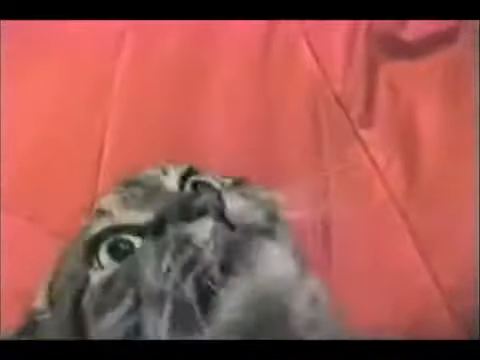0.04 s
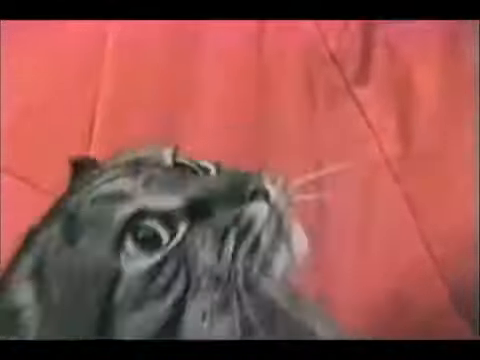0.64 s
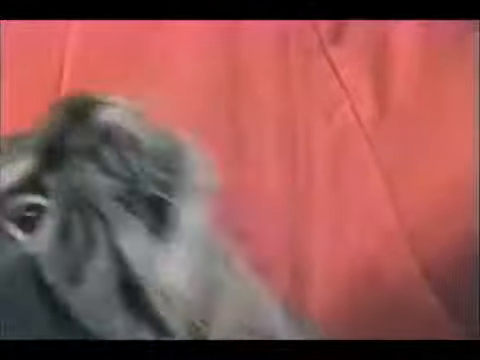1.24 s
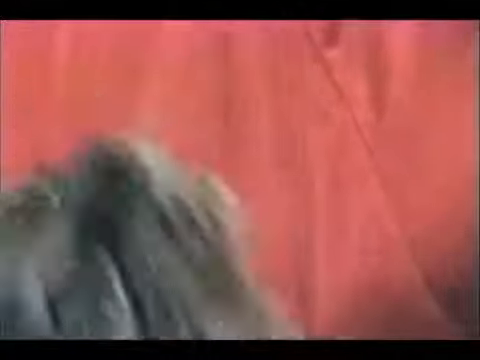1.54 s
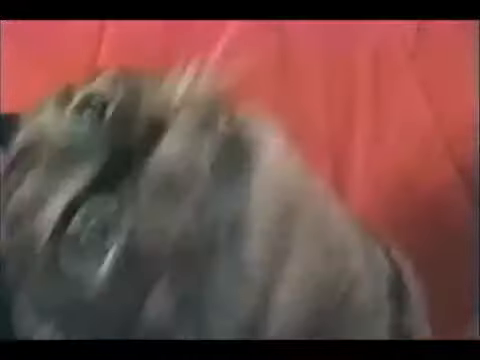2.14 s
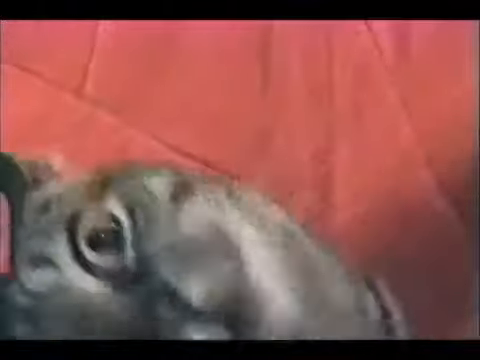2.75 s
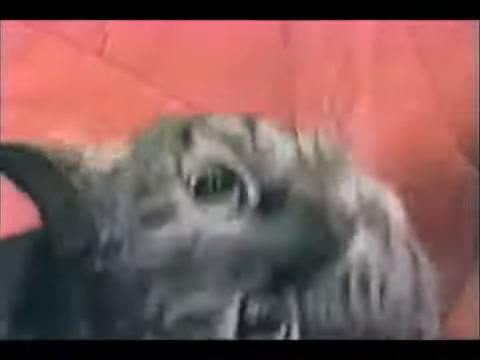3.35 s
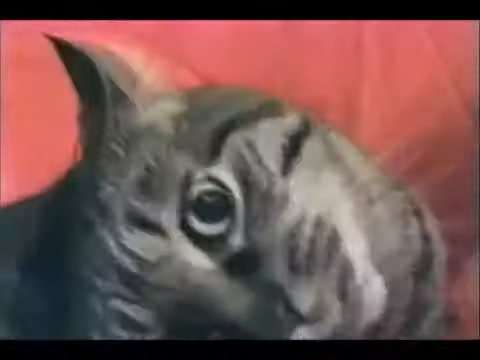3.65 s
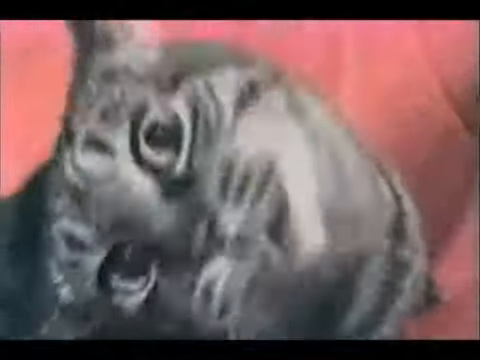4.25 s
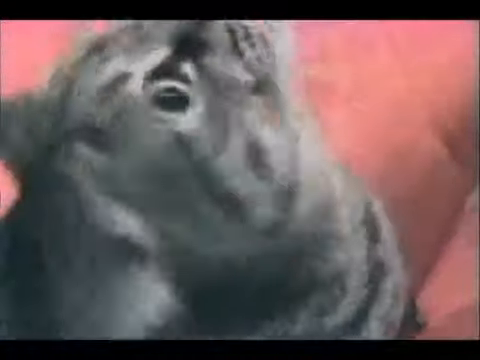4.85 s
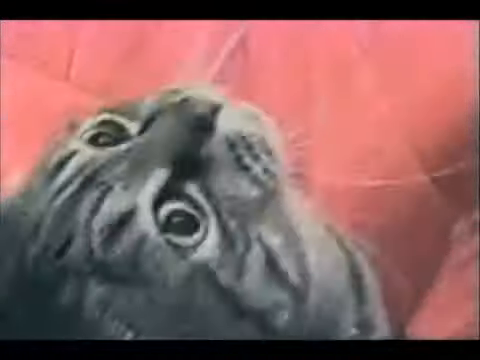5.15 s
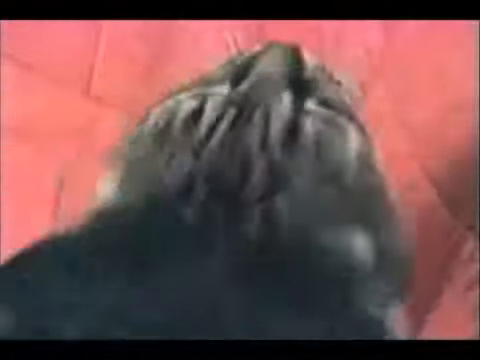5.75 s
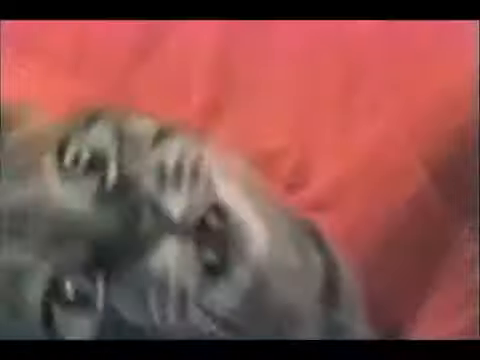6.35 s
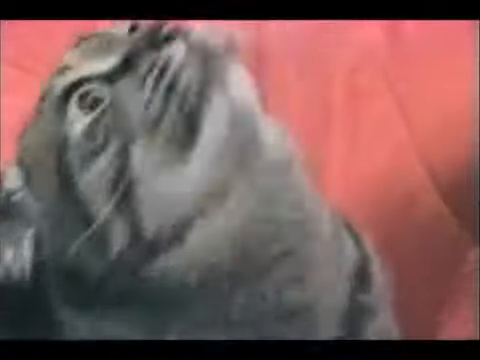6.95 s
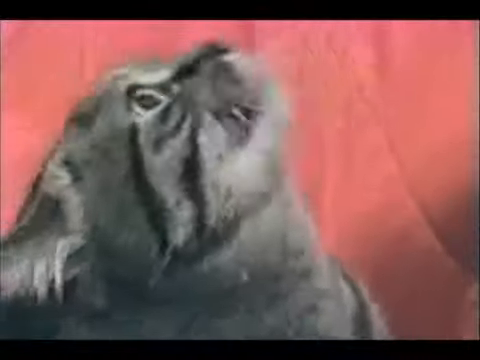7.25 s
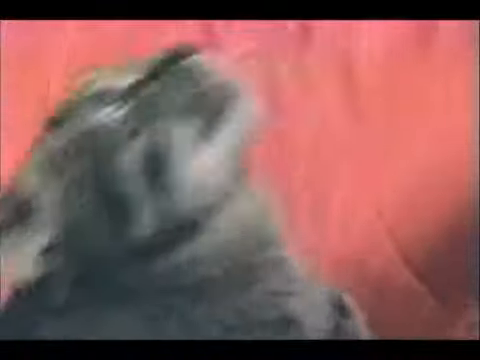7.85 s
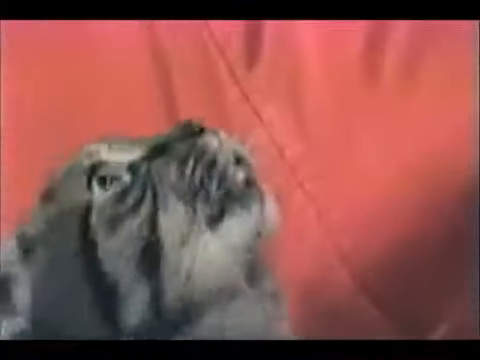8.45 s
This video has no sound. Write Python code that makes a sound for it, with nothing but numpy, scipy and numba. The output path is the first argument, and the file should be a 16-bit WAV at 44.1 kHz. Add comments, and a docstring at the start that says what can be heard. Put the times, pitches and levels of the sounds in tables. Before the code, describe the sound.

A cat yowls close to the microphone in a small furnished room. It gives a short call, two long wavering ones, then another short one, each nasal, sometimes raspy and broken into syllables as its jaw opens and shuts. Wet smacks of tongue and lips fall in the pauses, and fur brushes cloth briefly midway. A camcorder's faint motor whine and hiss run underneath.

```python
"""A cat yowls close by in a small room, four calls, each a chain of syllables as its jaw opens and shuts.
Vocal-fold pulses hum through the nose, ring the moving resonances of the mouth and break into rasps.
Underneath, a camcorder's motor whines and hums over its own hiss.
Wet smacks of tongue and lips fall between the calls, and fur rustles on cloth."""
import sys
import numpy as np
from scipy import signal
from scipy.fft import rfft, irfft
from scipy.io import wavfile
from scipy.ndimage import uniform_filter1d
from numba import njit

SR = 44100
rng = np.random.default_rng(int(sys.argv[2]) if len(sys.argv) > 2 else 0)


def generate_wav(signal):
    """Clip the signal to [-1, 1] and save it as 16-bit WAV at the path in sys.argv[1]."""
    frames = np.transpose(np.atleast_2d(signal))
    scaled = np.clip(frames, -1, 1) * 32767
    pcm = np.round(scaled).astype(np.int16)
    wavfile.write(sys.argv[1], SR, pcm)


N = 378819

# the four calls: start_s, end_s
YOWL_SPANS = [(0, .57), (1.318, 3.05), (4.303, 5.84), (7.895, 8.59)]
# vocal-fold pitch, one curve per yowl: time_s, pitch_hz
PITCH_CURVES = [
    [(0.0, 582), (0.03, 617), (0.114, 615), (0.286, 508), (0.346, 610), (0.38, 611), (0.44, 463),
     (0.534, 505), (0.544, 451), (0.57, 540)],
    [(1.315, 653), (1.329, 668), (1.343, 605), (1.419, 652), (1.485, 590), (1.643, 559), (1.735, 514),
     (1.787, 442), (1.829, 499), (1.929, 503), (1.945, 523), (2.059, 570), (2.197, 512), (2.407, 556),
     (2.475, 527), (2.795, 554), (2.903, 523), (3.03, 527)],
    [(4.3, 586), (4.316, 538), (4.338, 532), (4.366, 599), (4.426, 567), (4.472, 602), (4.494, 563),
     (4.634, 494), (4.706, 490), (4.718, 464), (4.74, 519), (4.874, 528), (4.93, 485), (5.04, 549),
     (5.23, 513), (5.46, 544), (5.586, 520), (5.82, 506)],
    [(7.9, 561), (7.954, 517), (7.974, 565), (8.012, 527), (8.058, 628), (8.122, 610), (8.2, 522),
     (8.21, 550), (8.254, 511), (8.332, 525), (8.368, 419), (8.386, 472), (8.472, 473), (8.488, 429),
     (8.5, 470), (8.59, 507)],
]
# the pitch flicks up as the long yowls are choked off: time_s
PITCH_FLICKS = [3.04, 5.84]
# where the folds lose their regular beat: start_s, end_s, rasp (0-1), period_doubling (0-1)
RASP_SPANS = [(0, 0.154, 0.06, 0), (0.154, 0.259, 0.16, 0.4), (.26, .46, .08, 0), (.46, 0.558, 0.41, 0.4),
              (1.31, 1.361, 0.75, 1), (1.364, 1.504, 0.07, 0.1), (1.71, 1.829, 0.11, 0.2),
              (2.897, 2.916, 0.44, 0.52), (4.287, 4.39, 0.36, 0.6), (4.39, 4.76, 0.07, 0),
              (7.9, 8.18, .05, 0), (8.188, 8.477, 0.13, 0.1), (8.48, 8.588, 0.2, 0)]
# the fundamental humming through the nose, one curve per yowl: time_s, level_db
HUM_CURVES = [
    [(0.0, -49), (0.016, -51), (0.046, -43), (0.268, -49), (0.306, -46), (0.344, -56), (0.424, -43),
     (0.518, -43), (0.54, -47), (0.57, -57)],
    [(1.32, -50), (1.832, -45), (2.042, -31), (2.2, -48), (2.296, -30), (2.588, -36), (2.69, -28),
     (2.77, -35), (3.01, -33), (3.04, -40)],
    [(4.31, -42), (4.588, -37), (4.766, -44), (4.872, -32), (4.928, -52), (5.046, -32), (5.232, -39),
     (5.46, -27), (5.498, -35), (5.83, -37)],
    [(7.895, -59), (7.921, -42), (8.033, -46), (8.101, -32), (8.183, -30), (8.203, -36), (8.455, -39),
     (8.513, -47), (8.553, -36), (8.59, -33)],
]
# each opening of the mouth and the four resonances, low to high, that make its vowel:
# open_s, shut_s, attack_s, throat_db, jaw_db, tongue_db, lips_db, tongue_hz
VOWELS = [(-0.045, 0.012, 0.009, -17.0, -41.0, -25.5, -33.5, 3000),
          (0.058, 0.162, 0.016, -23.0, -46.0, -35.5, -38.0, 3210),
          (0.139, 0.257, 0.026, -26.0, -34.0, -32.5, -43.5, 2860),
          (0.256, 0.465, 0.01, -45.5, -59.5, -56.0, -57.5, 2460),
          (0.464, 0.555, 0.01, -32.5, -51.5, -54.0, -53.0, 3010),
          (1.316, 1.457, 0.014, -37.0, -37.0, -26.0, -34.5, 3390),
          (1.422, 1.503, 0.012, -33.5, -29.5, -27.5, -42.0, 3060),
          (1.494, 1.615, 0.025, -21.5, -53.5, -38.5, -43.0, 3580),
          (1.602, 1.776, 0.051, -25.0, -31.0, -29.0, -41.5, 2640),
          (1.817, 1.9, 0.012, -21.5, -37.5, -33.5, -43.5, 2530),
          (1.925, 2.002, 0.009, -21.0, -32.5, -43.0, -46.0, 2670),
          (2.012, 2.207, 0.028, -22.0, -36.5, -36.0, -35.0, 2740),
          (2.174, 2.29, 0.015, -22.5, -29.5, -47.0, -53.0, 2620),
          (2.305, 2.45, 0.055, -31.0, -37.0, -41.5, -35.5, 2890),
          (2.466, 2.523, 0.055, -21.5, -27.5, -43.0, -37.0, 2730),
          (2.513, 2.637, 0.015, -22.5, -30.5, -45.0, -45.0, 2690),
          (2.713, 2.897, 0.035, -27.0, -29.0, -48.5, -33.0, 2380),
          (2.954, 2.978, 0.039, -18.5, -20.5, -34.5, -29.5, 2300),
          (4.314, 4.414, 0.009, -33.5, -29.0, -26.5, -39.5, 2600),
          (4.434, 4.47, 0.05, -15.5, -30.0, -26.5, -36.0, 2360),
          (4.515, 4.603, 0.055, -21.5, -38.5, -27.0, -31.0, 2670),
          (4.614, 4.707, 0.025, -24.5, -29.0, -40.5, -37.5, 2490),
          (4.735, 4.899, 0.055, -30.0, -41.0, -42.0, -40.0, 2620),
          (4.852, 5.006, 0.055, -20.5, -31.5, -42.0, -47.0, 2490),
          (5.0, 5.116, 0.025, -33.0, -37.5, -40.0, -39.5, 2740),
          (5.127, 5.208, 0.052, -25.5, -30.0, -36.0, -32.0, 2620),
          (5.227, 5.334, 0.019, -27.0, -30.0, -44.5, -43.5, 2680),
          (5.486, 5.579, 0.044, -25.5, -30.0, -38.5, -32.0, 2670),
          (5.606, 5.702, 0.055, -31.0, -34.0, -38.5, -40.0, 2600),
          (5.725, 5.796, 0.024, -28.5, -29.5, -41.0, -36.5, 2590),
          (7.978, 8.062, 0.013, -39.5, -52.0, -53.5, -55.5, 2840),
          (8.2, 8.299, 0.02, -24.0, -32.0, -42.0, -45.0, 2730),
          (8.32, 8.458, 0.042, -34.0, -48.0, -49.0, -48.5, 2890),
          (8.453, 8.555, 0.003, -19.5, -37.0, -45.0, -46.5, 2450),
          (8.524, 8.649, 0.004, -37.5, -41.0, -42.5, -45.0, 2450)]
# how each resonance rides a syllable: shut_early_s, release_s, swell_db, leak_db (against the hum)
THROAT_ENVELOPE = (.019, .023, 2.5, -15.5)
JAW_ENVELOPE = (.003, .018, -4.4, -20.5)
TONGUE_ENVELOPE = (.007, .021, -2.4, -28.5)
LIPS_ENVELOPE = (.012, .03, -1, -37)
# whistling laps of the tongue: centre_s, level_db
TONGUE_LAPS = [(0.165, -35.5), (2.503, -34.5), (2.915, -32.5), (4.62, -33.5), (4.884, -32.5), (5.23, -33.5),
               (5.722, -34.5), (8.213, -39.5)]
# tones of the camcorder's motor and head drum: pitch_hz, level_db
MOTOR_TONES = [(60, -76), (90, -69), (150, -67.5), (210, -69), (1078.6, -52), (2762, -70.5)]
# EQ curve of the hiss: frequency_hz, gain_db
HISS_EQ = [(15, -54), (25, -28), (145, -5.5), (603, -7), (884, -10), (1000, -8.5), (1080, -2), (1200, -13),
           (2710, -10), (5260, -18), (8970, -18), (11000, -26.5), (14300, -93), (22000, -120)]
# smacks of tongue and lips, levels before their trims: start_s, click_db, click_hz, cavity_db
SMACK_CUES = [(1.2385, -34, 6000, -60), (3.0762, -27, 6220, -36), (3.0792, -19.5, 2940, -38),
              (3.0851, -19.5, 6300, -27), (3.1465, -30, 7520, -50), (3.673, -27.5, 8890, -67),
              (4.1899, -31, 7600, -54), (5.8473, -19.5, 3540, -31), (6.6362, -28, 2330, -44.5),
              (6.7955, -24.5, 2570, -45), (6.8044, -27, 2660, -39), (6.828, -19, 9400, -40),
              (6.8534, -17.5, 2410, -28), (6.8604, -24, 2330, -36), (7.5986, -29.5, 7000, -57)]
# fur brushing cloth: centre_s, spread_s, level_db
RUSTLE_CUES = [(3.68, 0.045, -58), (3.806, 0.065, -44.5)]
# EQ curve of the rustle: frequency_hz, gain_db
RUSTLE_EQ = [(120, -22), (220, -2), (1100, -3.5), (3200, -8), (4200, -19), (7300, -8), (11000, -24)]

JAW_HZ, JAW_RISE_HZ = 1950, 120  # centre in mid-syllable, rise from opening to shutting
TONGUE_FALL_HZ, TONGUE_WIDTH_HZ = 300, 820  # the third resonance sinks through every syllable
LIPS_HZ, LIPS_WIDTH_HZ, LIPS_SWAY_HZ = 6000, 1400, 300  # the broad, wandering bright edge
LAP_HZ, LAP_REACH_HZ, LAP_WIDTH_HZ = 5950, 750, 650  # centre, sweep to either side, bandwidth


def undb(db):
    return 10 ** (np.asarray(db) / 20)


def unit(x):
    return x / np.sqrt(np.mean(x ** 2))


def drift(rate_hz, size):
    """Smooth random modulation with a spread near 1."""
    hold = max(int(SR / rate_hz), 1)
    steps = np.repeat(rng.standard_normal(size // hold + 1), hold)
    return 1.437 * uniform_filter1d(uniform_filter1d(steps, hold), hold)[:size]


def curve(points, t):
    return np.interp(t, *np.transpose(points))


def equalise(x, eq):
    """Shape x with an EQ curve and bring it to unit RMS."""
    hz, db = np.transpose(eq)
    bins_hz = np.maximum(np.fft.rfftfreq(len(x), 1 / SR), 1)
    gain = undb(np.interp(np.log(bins_hz), np.log(hz), db))
    return unit(irfft(rfft(x) * gain, len(x)))


@njit
def bandpass(x, hz, width_hz):
    """State-variable band-pass with a moving centre."""
    y, band_state, low_state = np.empty(len(x)), 0., 0.
    for i in range(len(x)):
        g, damping = np.tan(np.pi * hz[i] / SR), width_hz / hz[i]
        band = (band_state + g * (x[i] - low_state)) / (1 + g * (g + damping))
        band_state, low_state = 2 * band - band_state, low_state + 2 * g * band
        y[i] = damping * band
    return y


def resonate(x, hz, width_hz):
    """Two band-passes in series, for steep flanks."""
    hz = np.clip(hz + np.zeros(len(x)), 50, .45 * SR)
    return bandpass(bandpass(x + 1e-18, hz, float(width_hz)), hz, float(width_hz))


def formant(x, hz, width_hz, db):
    """One resonance of the voice, held at the given level."""
    ring = resonate(x, hz, width_hz)
    power = np.abs(uniform_filter1d(ring ** 2, int(.012 * SR)))
    return ring * undb(db) / np.sqrt(power + 1e-12)


def vocal_folds(hz, rasp, doubling, harmonics=22):
    """Fold pulses with a puff of air in each cycle; a rasp scatters their timing and strength."""
    n = len(hz)
    jitter = (0.00488 + 0.0711 * rasp) * drift(90, n) + (0.0042 + 0.1 * rasp) * drift(700, n)
    phase = 2 * np.pi * np.cumsum(hz * (1 + jitter)) / SR
    pulses = unit(sum(np.cos(k * phase) for k in range(1, harmonics + 1)))
    # every other pulse is weaker when the period doubles
    strength = 1 + doubling * np.cos(phase / 2) + (0.059 + 1.05 * rasp) * drift(600, n)
    # turbulence is mostly treble, so the low harmonics stay clear
    highpass = signal.butter(1, 2500, "high", fs=SR, output="sos")
    turbulence = signal.sosfilt(highpass, rng.standard_normal(n))
    air = (0.021 + 2.8 * rasp) * (1 + np.cos(phase)) * turbulence
    return pulses * strength + air


def mouth(t, hum_db, tremble_db=1.4):
    """Yield each resonance's level (dB), stroke (-.5 opening to .5 shutting) and tongue place (Hz)."""
    envelopes = THROAT_ENVELOPE, JAW_ENVELOPE, TONGUE_ENVELOPE, LIPS_ENVELOPE
    for column, (early_s, release_s, swell_db, leak_db) in enumerate(envelopes):
        power, stroke, place, weight = 0, 0, 0, 1e-30
        for open_s, shut_s, attack_s, *vowel_db, tongue_hz in VOWELS:
            opening = (1 + np.tanh((t - open_s) / attack_s)) / 2
            shutting = (1 + np.tanh((shut_s - early_s - t) / release_s)) / 2
            gate = opening * shutting
            progress = np.clip((t - open_s) / (shut_s - open_s), 0, 1) - .5
            power += (gate * undb(vowel_db[column] + swell_db * progress)) ** 2
            stroke += gate * progress
            place += gate * tongue_hz
            weight += gate
        # a little of the hum leaks out between syllables
        level_db = 10 * np.log10(power + undb(hum_db + leak_db) ** 2)
        yield level_db + tremble_db * drift(30, len(t)), stroke / weight, place / weight


def reflection(x, lag_s, sway_s):
    """A close bounce whose path changes as the head turns, combing the upper harmonics."""
    i = np.arange(len(x))
    delay = SR * (lag_s + sway_s * drift(7.8, len(x)))
    return x + .9 * np.interp(i - delay, i, x)


def nasal_notch(x, hz, width_hz):
    """The nasal side branch swallows the sound near its own resonance."""
    return x - bandpass(x, np.full(len(x), float(hz)), float(width_hz))


def yowl(start_s, end_s, pitch_curve, hum_curve):
    """One call: the fundamental hums through the nose, the overtones leave through the moving mouth."""
    t = np.arange(N) / SR
    inside = (t >= start_s) & (t <= end_s)
    t = t[inside]
    flick = sum(np.exp(-((t - time_s) / .014) ** 2) for time_s in PITCH_FLICKS)
    pitch_hz = curve(pitch_curve, t) * (1 + 0.37 * flick)
    roughness = sum(np.outer(amounts, (t > on) & (t <= off)) for on, off, *amounts in RASP_SPANS)
    rasp, doubling = uniform_filter1d(roughness, int(0.021 * SR))
    buzz = vocal_folds(pitch_hz, rasp, doubling)

    hum_db = curve(hum_curve, t)
    levels_db, strokes, places_hz = zip(*mouth(t, hum_db))
    throat_db, jaw_db, tongue_db, lips_db = levels_db
    jaw_hz = JAW_HZ + JAW_RISE_HZ * strokes[1]
    tongue_hz = places_hz[2] - TONGUE_FALL_HZ * strokes[2]
    voice = formant(buzz, pitch_hz, 196, hum_db)
    voice += formant(buzz, 2 * pitch_hz, 330, throat_db)  # the throat tracks the second harmonic
    voice += formant(buzz, jaw_hz, 437, jaw_db)
    voice += formant(nasal_notch(buzz, 3950, 900), tongue_hz, TONGUE_WIDTH_HZ, tongue_db)
    combed = nasal_notch(reflection(buzz, lag_s=0.0007054, sway_s=0.00013), 3550, 1000)
    voice += tongue_laps(buzz, t)
    voice += bright_edge(combed, lips_db)

    fade = np.clip(np.minimum(t - start_s, end_s - t) / 0.002, 0, 1)
    out = np.zeros(N)
    out[inside] = voice * fade
    return out


def bright_edge(buzz, lips_db):
    """The sheen of the voice: a wandering lip resonance with a fainter one riding above it."""
    lips_hz = LIPS_HZ + LIPS_SWAY_HZ * drift(9, len(buzz))
    top_hz = 1.45 * lips_hz * (1 + 0.048 * drift(10, len(buzz)))
    edge = formant(buzz, lips_hz, LIPS_WIDTH_HZ, lips_db) + formant(buzz, top_hz, 940, lips_db - 17)
    # short waves are the most sensitive to the turning head, so the edge comes and goes
    return reflection(edge, lag_s=0.0003998, sway_s=.00005) / np.sqrt(2)


def camcorder(hiss_db=-54):
    """The noise bed: steady motor tones, wavering slightly, over hiss."""
    motor = 0
    for pitch_hz, level_db in MOTOR_TONES:
        amplitude = np.sqrt(2) * undb(level_db + 0.38 * drift(13, N))
        cycles = rng.random() + np.cumsum(pitch_hz * (1 + 0.001026 * drift(14, N))) / SR
        motor += amplitude * np.sin(2 * np.pi * cycles)
    hiss = equalise(rng.standard_normal(N), HISS_EQ) * undb(hiss_db + .5 * drift(7.9, N))
    return motor + hiss


def tongue_laps(buzz, t, half_length_s=0.035):
    """Each lap of the tongue sweeps a narrow resonance up through the high harmonics."""
    centre_s, level_db = np.transpose(TONGUE_LAPS)
    nearest = np.argmin(np.abs(t[:, None] - centre_s), axis=1)
    stroke = (t - centre_s[nearest]) / half_length_s
    sweep_hz = LAP_HZ + LAP_REACH_HZ * np.tanh(stroke)
    return formant(buzz, sweep_hz, LAP_WIDTH_HZ, level_db[nearest]) * np.exp(-stroke ** 2)


def smacks(click_trim_db=-24, cavity_trim_db=-11.5):
    """Tongue or lips part: a bright click, a wet fizz after it and a lower ring of the mouth cavity."""
    out, t = np.zeros(N + SR), np.arange(SR // 10) / SR
    snap_and_fizz = np.exp(-t / 0.0024) + undb(-7) * np.exp(-t / 0.018)
    for start_s, click_db, click_hz, cavity_db in SMACK_CUES:
        click_noise, cavity_noise = rng.standard_normal((2, len(t)))
        click = resonate(click_noise * snap_and_fizz, click_hz, 1.4 * click_hz)
        click = unit(nasal_notch(click, 4000, 1600)) * undb(click_db + click_trim_db)
        cavity = resonate(cavity_noise * t * np.exp(-t / .0045), hz=690, width_hz=430)
        first = int(start_s * SR)
        out[first:first + len(t)] += click + unit(cavity) * undb(cavity_db + cavity_trim_db)
    return out[:N]


def fur_rustles(ticks_per_s=4, tick_db=-69):
    """Grainy swishes of fur on cloth as the cat shifts, and tiny stray ticks throughout."""
    t = np.arange(N) / SR
    swell = sum(undb(level_db) * np.exp(-.5 * ((t - centre_s) / spread_s) ** 2)
                for centre_s, spread_s, level_db in RUSTLE_CUES)
    grains = rng.standard_normal(N) * undb(4 * drift(120, N))
    swish = equalise(grains, RUSTLE_EQ) * swell
    ticks = (rng.random(N) < ticks_per_s / SR) * (.5 + rng.random(N))
    return swish + unit(resonate(ticks, hz=4500, width_hz=7000)) * undb(tick_db)


def room(x, t60_s=0.69, wet_db=-26):
    """A small furnished room: a short, dull tail."""
    t = np.arange(SR // 3) / SR
    tail = rng.standard_normal(len(t)) * undb(-60 * t / t60_s)
    tail = signal.sosfilt(signal.butter(1, 5000, fs=SR, output="sos"), tail)
    return x + undb(wet_db) * signal.fftconvolve(x, tail / np.linalg.norm(tail))[:N]


def scene():
    """The mono mix: the cat in its room, over the camcorder's own noise."""
    yowls = sum(yowl(*span, pitch, hum) for span, pitch, hum in zip(YOWL_SPANS, PITCH_CURVES, HUM_CURVES))
    return (room(yowls + smacks() + fur_rustles()) + camcorder())[None]


def record(dry, cutoff_hz=11000):
    """A steep low-pass takes the air off the top."""
    return signal.sosfilt(signal.ellip(8, .2, 70, cutoff_hz, fs=SR, output="sos"), dry)


dry = scene()
out = record(dry)
generate_wav(out)
```